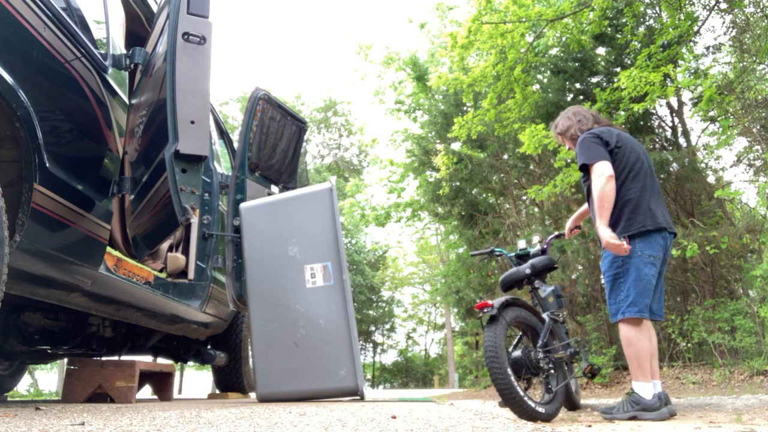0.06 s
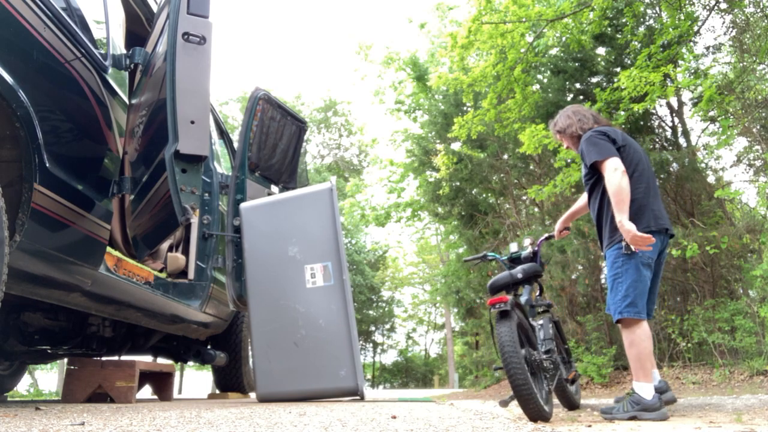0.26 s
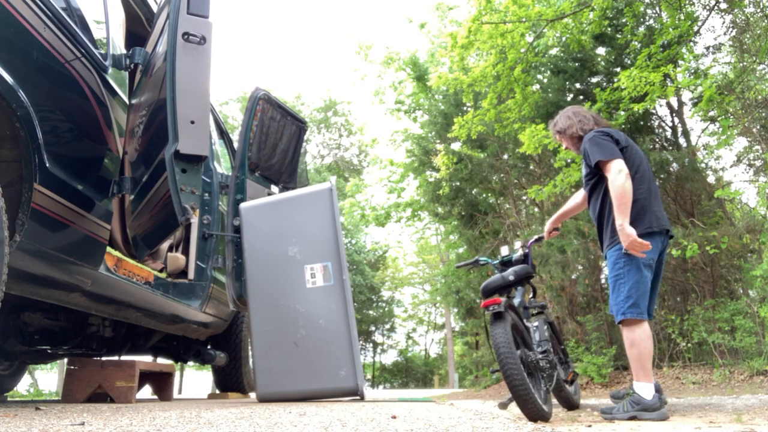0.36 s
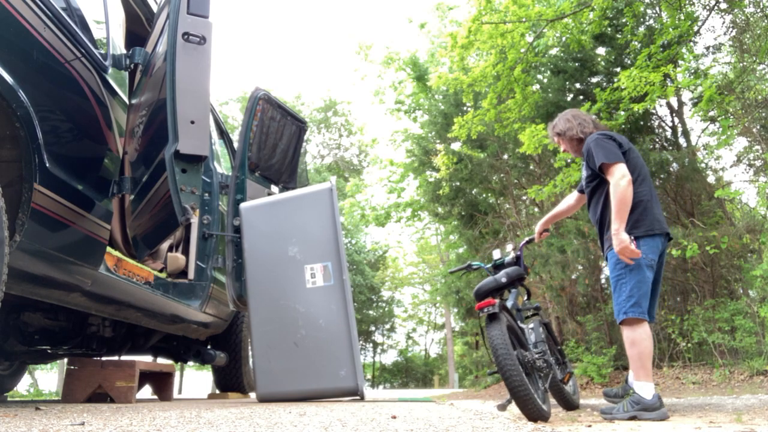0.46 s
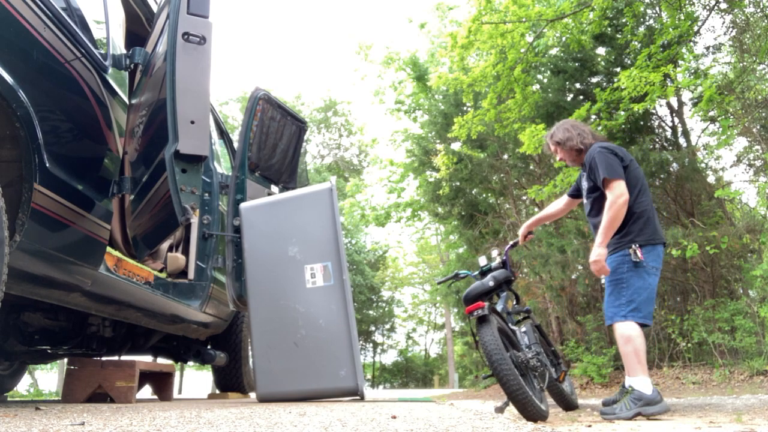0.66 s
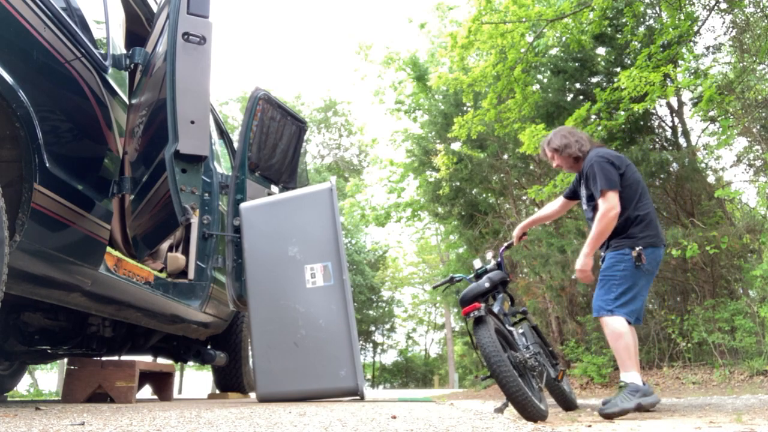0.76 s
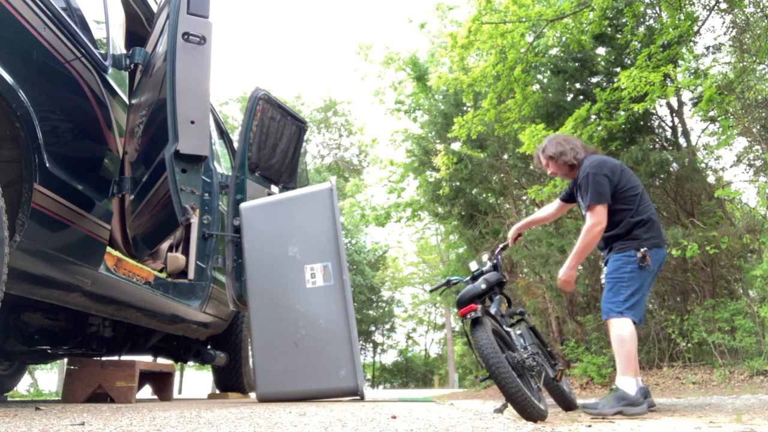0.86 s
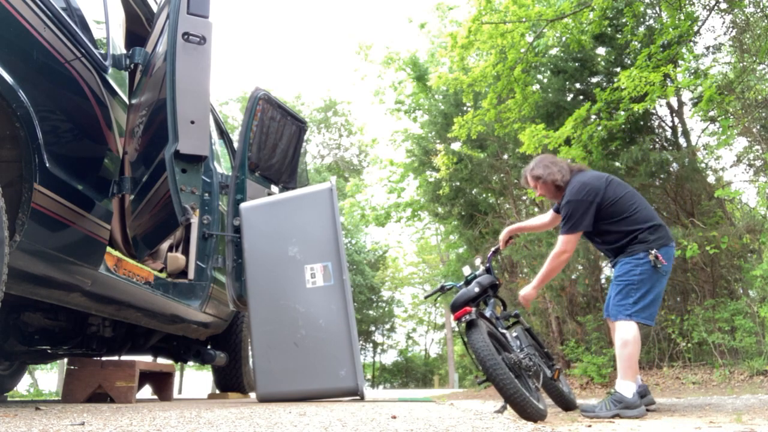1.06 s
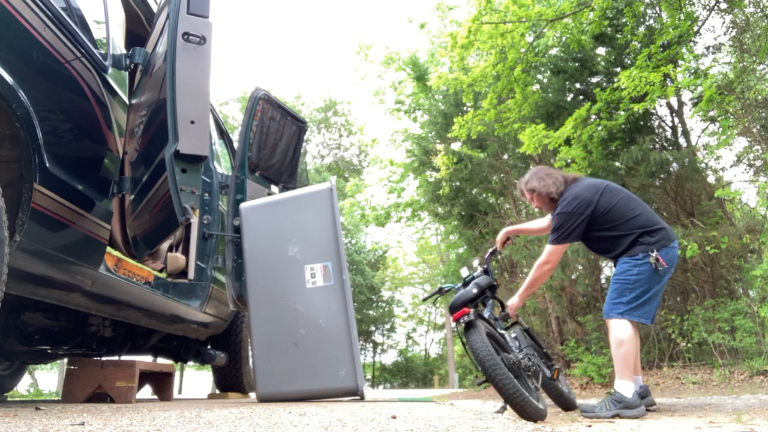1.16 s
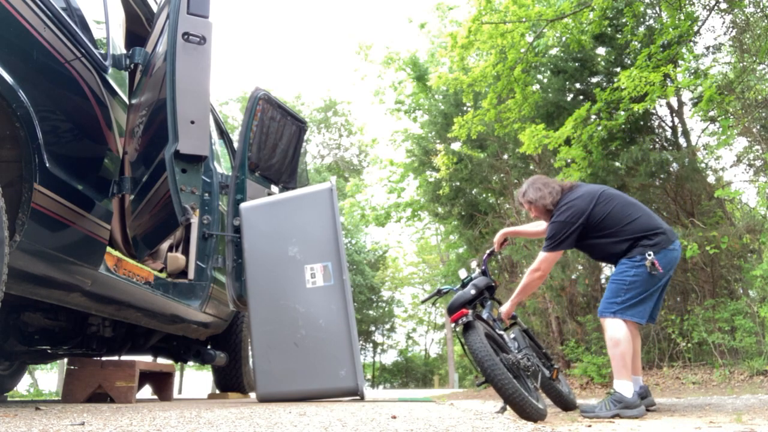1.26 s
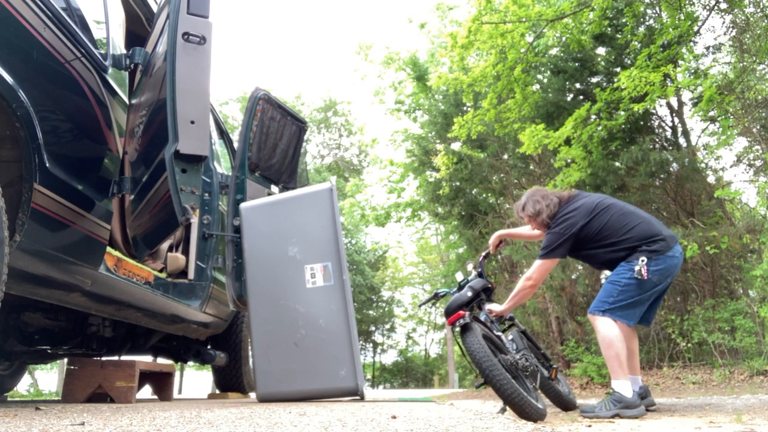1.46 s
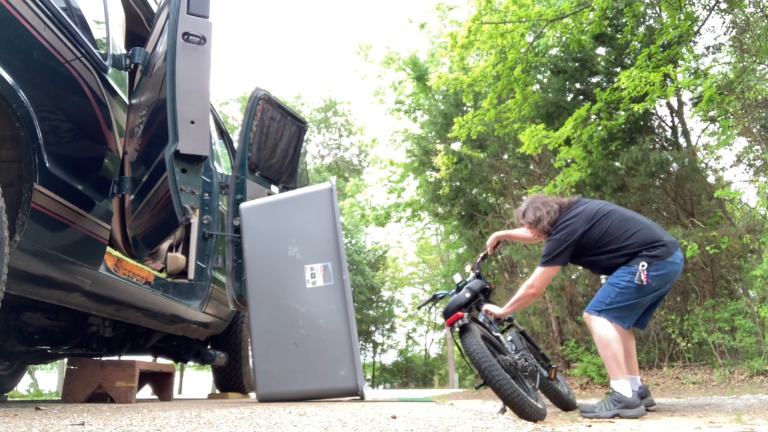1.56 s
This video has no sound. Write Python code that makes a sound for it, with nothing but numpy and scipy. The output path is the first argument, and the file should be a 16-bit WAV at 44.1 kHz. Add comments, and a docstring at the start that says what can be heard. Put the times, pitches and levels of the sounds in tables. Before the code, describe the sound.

A heavy bike is set on its kickstand with a metal clack, thump and small knocks.

```python
"""A heavy electric bike is leaned onto its kickstand on a gritty driveway, a few metres away.
The metal stand clacks out, scrapes over grit and takes the weight with a thump at 0.33 s.
Frame and rack knock as the bike rocks on its tyres. Near 0.9 s a shoe scuffs and steps.
From 1.2 s a hand clicks a latch, rattles a small fitting and clicks twice more.
Short reflections and faint outdoor air throughout."""
import sys
import numpy as np
from scipy import signal
from scipy.fft import rfft, irfft, next_fast_len
from scipy.io import wavfile

SR = 44100
rng = np.random.default_rng(int(sys.argv[2]) if len(sys.argv) > 2 else 0)


def int16_out(signal):
    """Quantize to a 16-bit WAV file."""
    q = np.round(np.clip(np.atleast_2d(signal).T, -1, 1) * 32767)
    wavfile.write(sys.argv[1], SR, q.astype(np.int16))


N = 70560

# Spectrum of stand and latch clacks. Each row: frequency in Hz, relative level in dB.
CLACK_SPECTRUM = [(250, -21), (850, -10.5), (1250, -1), (1900, 4.5), (2600, -9), (4300, 1.5), (5600, -5.5),
                  (8700, -10.5), (15000, -26)]
# Spectrum of tyres on grit. Each row: frequency in Hz, relative level in dB.
TYRE_SPECTRUM = [(30, -39.5), (180, -3.5), (450, -5.5), (700, -1), (970, 0.5), (1100, -9.5), (1500, -6),
                 (2300, -17), (15000, -63.5)]
CLACK_RISE_S, CLACK_T60_S = 0.0025, 0.032


def amp(db):
    """Decibels to gain."""
    return 10 ** (np.asarray(db) / 20)


def unit(x):
    """Scale to unit rms."""
    return x / np.sqrt(np.mean(x ** 2) + 1e-20)


def decay(t_s, t60_s):
    """Exponential fall, 60 dB in t60_s."""
    return np.exp(-np.log(1000) * t_s / t60_s)


def lookup(table, hz):
    """Interpolate on a log-frequency axis."""
    table_hz, values = np.transpose(table)
    return np.interp(np.log(hz + 1), np.log(table_hz + 1), values)


def colour(x, spectrum):
    """Minimum-phase filter of unit energy."""
    hz = np.fft.rfftfreq(4096, 1 / SR)
    log_gain = np.log(amp(lookup(spectrum, hz)))
    mirrored = np.r_[log_gain, log_gain[-2:0:-1]]
    log_response = np.conj(signal.hilbert(mirrored))[:len(hz)]
    taps = irfft(np.exp(log_response))
    return signal.fftconvolve(x, taps / np.linalg.norm(taps))[:len(x)]


def noise_band(centre_hz, relative_width):
    """Unit-rms noise in a bell around a pitch."""
    hz = np.fft.rfftfreq(N, 1 / SR)
    offset = (hz / centre_hz - 1) / relative_width
    return unit(irfft(rfft(rng.standard_normal(N)) / (1 + offset ** 2), N))


def swell(start_s, rise_s, t60_s):
    """Linear rise, exponential fall."""
    t = np.arange(N) / SR - start_s
    return np.clip(t / rise_s, 0, 1) * decay(np.maximum(t - rise_s, 0), t60_s)


def bursts(rows, spectrum):
    """Rough contacts: one spray of tiny impacts per row."""
    power = sum((amp(db) * swell(start_s, rise_s, t60_s)) ** 2 for start_s, db, rise_s, t60_s in rows)
    return colour(np.sqrt(power) * rng.choice([-1., 1.], N), spectrum)


def ring(hits, modes, contact_s, detune, vary_db):
    """Each hit swells over the contact time and rings the modes, varied in pitch and level."""
    out, t = np.zeros(N), np.arange(SR // 3) / SR
    onset = np.sin(np.pi / 2 * np.minimum(t / contact_s, 1)) ** 2
    for start_s, hit_db in hits:
        span = out[round(start_s * SR):][:len(t)]
        for hz, mode_db, t60_s in modes:
            gain = amp(hit_db + mode_db + vary_db * rng.standard_normal())
            detuned_hz = hz * (1 + detune * rng.standard_normal())
            tone = np.sin(2 * np.pi * detuned_hz * (t - contact_s))
            span += (gain * onset * decay(t, t60_s) * tone)[:len(span)]
    return out


def friction(levels, spectrum, slips_per_s, spread_db):
    """Dense slips of uneven size under a level curve."""
    slips = (rng.random(N) < slips_per_s / SR) * rng.choice([-1., 1.], N)
    sizes = amp(spread_db * np.minimum(rng.exponential(1, N), 4))
    envelope = amp(np.interp(np.arange(N) / SR, *np.transpose(levels)))
    return colour(unit(slips * sizes) * envelope, spectrum)


def kickstand():
    """Metal chatters against its stop and rings; the foot drags over grit."""
    # Each row: start in seconds, chatter level in dB, ring level in dB.
    clacks = [(0.1989, -31.5, -39), (0.2173, -33, -42.5), (0.2953, -42, -38), (0.305, -43, -58),
              (0.327, -29.5, -49), (0.338, -34.5, -55), (0.4956, -41, -59)]
    # Each row: frequency in Hz, gain in dB, T60 in seconds.
    stand_modes = [(760, -2.5, 0.094), (935, 0.5, 0.04), (1470, -2.5, 0.033), (1865, 7, 0.028),
                   (4150, 7, 0.028)]
    # Each row: time in seconds, level in dB.
    scrape_levels = [(0, -70), (.195, -66), (.21, -47), (.243, -61), (.257, -46), (.32, -48), (.375, -45.5),
                     (.44, -71.5), (.74, -58.5), (.81, -66), (.84, -59.5), (.885, -95)]
    # Each row: frequency in Hz, relative level in dB.
    scrape_spectrum = [(150, -25.5), (800, -2), (1900, 2), (3200, -2.5), (4400, -4), (5800, -12),
                       (8800, -12), (15000, -35.5)]
    chatter = bursts([(s, db, CLACK_RISE_S, CLACK_T60_S) for s, db, _ in clacks], CLACK_SPECTRUM)
    metal = ring([(s, db) for s, _, db in clacks], stand_modes, contact_s=0.0015, detune=0.02, vary_db=2)
    return chatter + metal + friction(scrape_levels, scrape_spectrum, slips_per_s=2800, spread_db=4)


def landing():
    """The weight lands in three quick blows; the bike rocks on its tyres with soft low bumps."""
    # Each row: start in seconds, level in dB.
    thumps = [(.328, -25.5), (0.333, -35), (0.3405, -29.5)]
    # Each row: frequency in Hz, gain in dB, T60 in seconds.
    thump_modes = [(124.5, -15, 0.37), (186, -12, 0.13), (440, 0, 0.039), (615, -10, 0.025),
                   (732, 1.5, 0.036), (800, -1, 0.039), (962, -10.5, 0.073), (1196, -18, 0.15),
                   (1793, -3, 0.044)]
    # Each row: start in seconds, level in dB, rise and T60 in seconds.
    bumps = [(.275, -54, 0.03, 0.28), (.39, -55, 0.017, 0.12), (.495, -56, 0.0064, 0.41),
             (.61, -49, 0.018, .13)]
    # Each row: frequency in Hz, relative level in dB.
    bump_spectrum = [(25, -52), (55, 10), (170, 0), (600, -63)]
    crunch_db, rise_s, t60_s = -6, 0.001, 0.04
    crunch = bursts([(s, db + crunch_db, rise_s, t60_s) for s, db in thumps], TYRE_SPECTRUM)
    blows = ring(thumps, thump_modes, contact_s=0.00185, detune=0.004, vary_db=1)
    return blows + crunch + bursts(bumps, bump_spectrum)


def frame():
    """Loose parts knock dully, a tick on top, over the shudder of the rolling bike."""
    # Each row: start in seconds, knock level in dB, tick level in dB.
    knocks = [(0.31, -38, -35), (.394, -37, -38), (0.4075, -33.5, -34), (0.4636, -39.5, -51),
              (0.4952, -35.5, -40), (0.5249, -45.5, -47), (0.5784, -37, -42), (.613, -41, -55),
              (.6385, -37.5, -58.5), (.757, -53.5, -52), (0.8903, -50.5, -72)]
    # Each row: frequency in Hz, gain in dB, T60 in seconds.
    frame_modes = [(236.5, -16, 0.091), (380, -7, 0.028), (616, -2, 0.022), (763, 1.5, 0.011),
                   (922, -1.5, 0.043)]
    # Each row: frequency in Hz, relative level in dB.
    tick_spectrum = [(300, 12.5), (1200, 5.5), (4400, 6.5), (6000, -3), (15000, -25)]
    # Each row: time in seconds, level in dB.
    roll_levels = [(0, -54), (.28, -54.5), (.35, -37.5), (.44, -55.5), (.485, -55.5), (.505, -45.5),
                   (.57, -64.5), (.665, -50.5), (.74, -55), (.81, -59), (.91, -67.5), (.99, -50),
                   (1.05, -69)]
    rise_s, t60_s = 0.00039, 0.015
    body = ring([(s, db) for s, db, _ in knocks], frame_modes, contact_s=0.0018, detune=0.015, vary_db=1)
    ticks = bursts([(s, db, rise_s, t60_s) for s, _, db in knocks], tick_spectrum)
    return body + ticks + friction(roll_levels, TYRE_SPECTRUM, slips_per_s=1800, spread_db=1)


def grit():
    """Single grains crack and squeak under load; at 0.83 s the scuffing shoe rings briefly near 2.8 kHz."""
    # Each row: start in seconds, level in dB, pitch in Hz, T60 in seconds.
    cracks = [(0.253, -40, 4380, 0.018), (0.493, -41, 5580, 0.016), (0.7693, -49.5, 14000, 0.028),
              (0.83, -51.5, 2790, 0.08), (0.839, -52, 8350, 0.0078)]
    return sum(amp(db) * noise_band(hz, relative_width=0.13) * swell(s, rise_s=0.0022, t60_s=t60_s)
               for s, db, hz, t60_s in cracks)


def shoe():
    """The sole scuffs; heel and toe thud down."""
    # Each row: start in seconds, level in dB.
    footfalls = [(.9425, -33.5), (.980, -50)]
    # Each row: frequency in Hz, gain in dB, T60 in seconds.
    sole_modes = [(374, -2, 0.044), (538, -1.5, 0.053), (910, 3.5, 0.044), (1390, -5.5, 0.061)]
    # Each row: start in seconds, level in dB, rise and T60 in seconds.
    scuffs = [(.824, -47, 0.015, 0.058), (.848, -46.5, 0.0077, 0.016), (.937, -39.5, 0.0091, 0.068),
              (.968, -51, 0.014, 0.034)]
    # Each row: frequency in Hz, relative level in dB.
    scuff_spectrum = [(60, -22.5), (520, -5), (690, 5), (970, -4), (1100, -19.5), (1500, -11),
                      (2200, -19.5), (4600, -25), (15000, -50.5)]
    thuds = ring(footfalls, sole_modes, contact_s=0.004, detune=0.019, vary_db=2.5)
    return thuds + bursts(scuffs, scuff_spectrum)


def fitting():
    """A hand rubs along the bike; a small part chatters, its impacts driving short resonances."""
    # Each row: start in seconds, level in dB, rise and T60 in seconds.
    rattles = [(1.289, -53.5, 0.0034, 0.093), (1.306, -54.5, 0.0053, 0.055)]
    # Each row: start in seconds, level in dB, rise and T60 in seconds.
    rubs = [(1.25, -68.5, 0.012, 0.61), (1.442, -61.5, 0.0091, 0.21)]
    # Each row: frequency in Hz, relative level in dB.
    contact_spectrum = [(400, -19), (800, 2), (2300, 0.5), (5500, -3), (7000, -8), (15000, -34)]
    # Each row: frequency in Hz, relative level in dB.
    fitting_modes = [(790, 4), (1820, 1), (2740, -3), (3260, 1), (4260, 1.5), (5030, 0), (5800, -4.5)]
    t = np.arange(SR // 8) / SR
    chatter = bursts(rattles, contact_spectrum)
    body = sum(amp(db) * np.sin(2 * np.pi * hz * t) for hz, db in fitting_modes) * decay(t, t60_s=0.028)
    ringing = signal.fftconvolve(chatter, body / np.linalg.norm(body))[:N]
    return chatter + amp(-0.5) * ringing + bursts(rubs, contact_spectrum)


def latch():
    """A latch snaps with a bright ping over a small hollow body."""
    # Each row: start in seconds, level in dB.
    clicks = [(1.233, -54), (1.469, -60), (1.499, -61.5)]
    # Each row: frequency in Hz, gain in dB, T60 in seconds.
    latch_modes = [(979, 4, 0.074), (1285, 0, 0.063), (1820, -3.5, 0.11), (4210, 7, 0.021)]
    snap = bursts([(s, db + 4, CLACK_RISE_S, CLACK_T60_S) for s, db in clicks], CLACK_SPECTRUM)
    return snap + ring(clicks, latch_modes, contact_s=0.00192, detune=0.0069, vary_db=1)


def reflections(direct):
    """Sparse echoes off a vehicle and trees, different on each side."""
    # Each row: frequency in Hz, T60 in seconds.
    decay_times = [(900, 0.11), (12000, 0.34)]
    echoes_per_s, shape = 2500, (2, SR // 2)
    taps = rng.standard_normal(shape) * (rng.random(shape) < echoes_per_s / SR)
    taps[:, :SR // 300] = 0  # 3.3 ms pre-delay
    hz, t, spectra = signal.stft(taps, SR, nperseg=256)
    spectra *= decay(t, lookup(decay_times, hz)[:, None])
    tail = signal.istft(spectra, SR, nperseg=256)[1]
    tail /= np.linalg.norm(tail, axis=1, keepdims=True)
    return signal.fftconvolve(direct[None], tail, axes=1)[:, :N]


def air():
    """Low outdoor rumble, partly different on each side, and a thin steady hiss."""
    # Each row: frequency in Hz, relative level in dB.
    air_spectrum = [(20, -29.5), (60, 2), (155, -1), (350, -13.5), (950, -27), (1200, -32.5), (4200, -27),
                    (6000, -38.5), (15000, -40)]
    common, left, right = (colour(rng.standard_normal(N + 4096), air_spectrum)[-N:] for _ in range(3))
    rumble = common + amp(-6) * np.array([left, right])
    hiss = noise_band(centre_hz=8270, relative_width=0.013)
    return amp(-65) * rumble + amp(-80.5) * hiss


def scene():
    """Bike and rider, their reflections and the air, in stereo."""
    direct = kickstand() + landing() + frame() + grit() + shoe() + fitting() + latch()
    return direct + amp(-7) * reflections(direct) + air()


def record(dry):
    """Two microphone ports differing in phase and level, then a low-pass."""
    # Each row: frequency in Hz, phase lead of the left port in radians.
    port_phase = [(60, 0), (250, 1.02), (480, -0.56), (1230, -1.14), (1650, -1.5), (3900, -0.99),
                  (6000, -2), (8790, -7.5), (12000, -12), (16000, -18)]
    # Each row: frequency in Hz, left minus right level in dB.
    port_balance = [(180, 0.5), (410, 4.8), (900, 0.29), (1500, 2), (15000, 0.31)]
    cutoff_hz = 15850
    size = next_fast_len(N + 4096)
    hz = np.fft.rfftfreq(size, 1 / SR)
    left_gain = amp(lookup(port_balance, hz) / 2) * np.exp(0.5j * lookup(port_phase, hz))
    ports = irfft(rfft(dry, size) * np.array([left_gain, 1 / left_gain]), size)[:, :N]
    lowpass = signal.firwin(511, cutoff_hz, window=("kaiser", 9), fs=SR)
    return signal.oaconvolve(ports, lowpass[None], "same")


dry = scene()
out = record(dry)
int16_out(out)
```